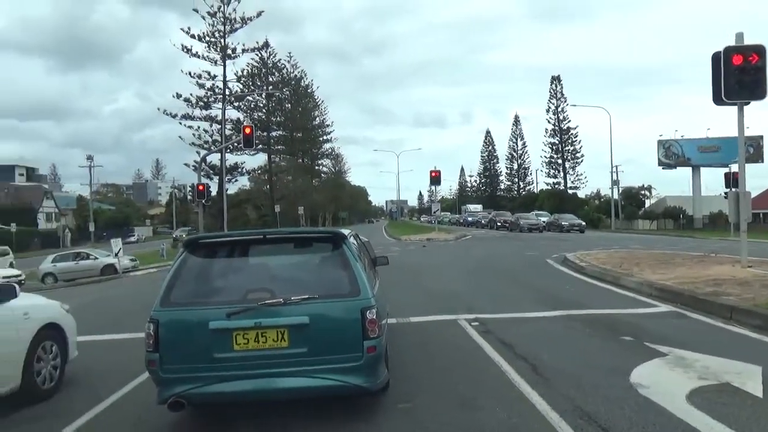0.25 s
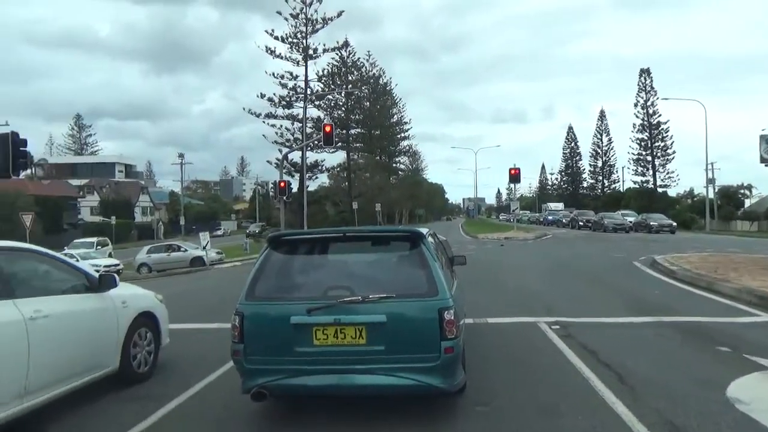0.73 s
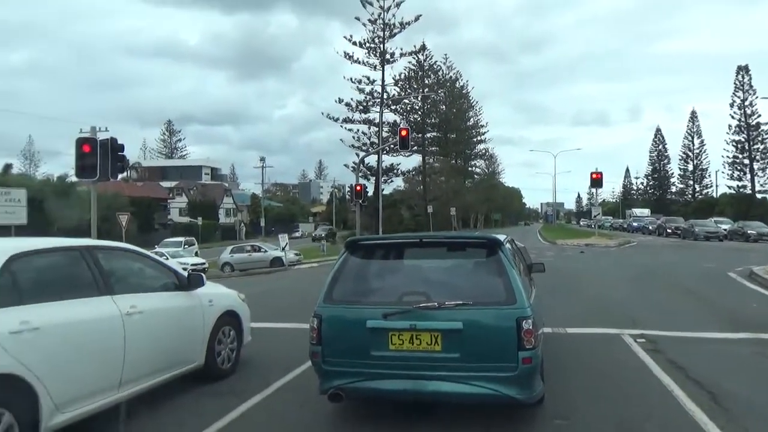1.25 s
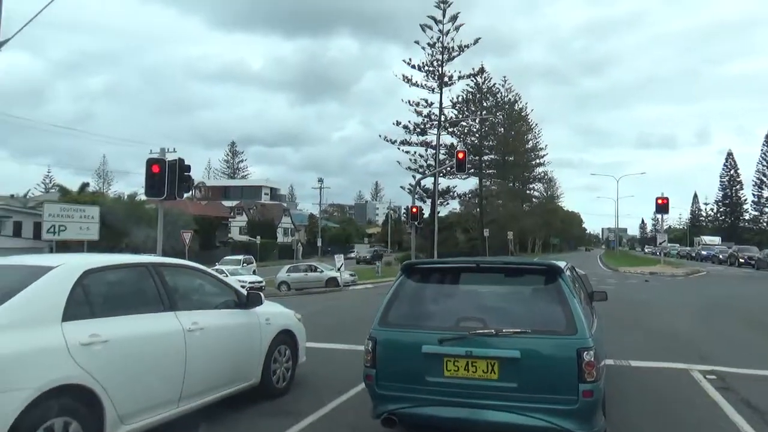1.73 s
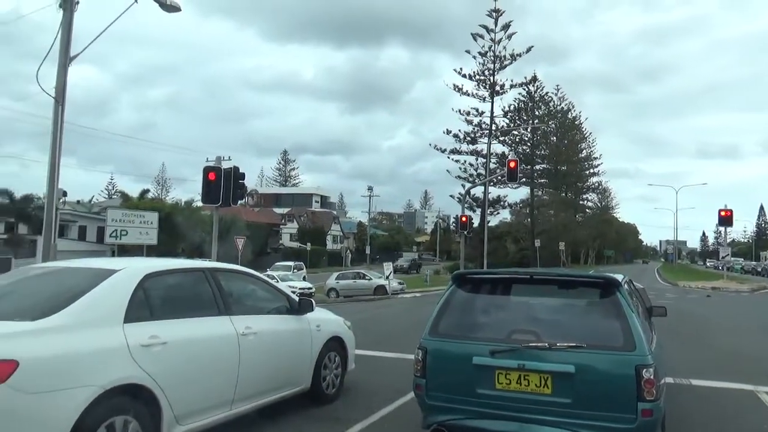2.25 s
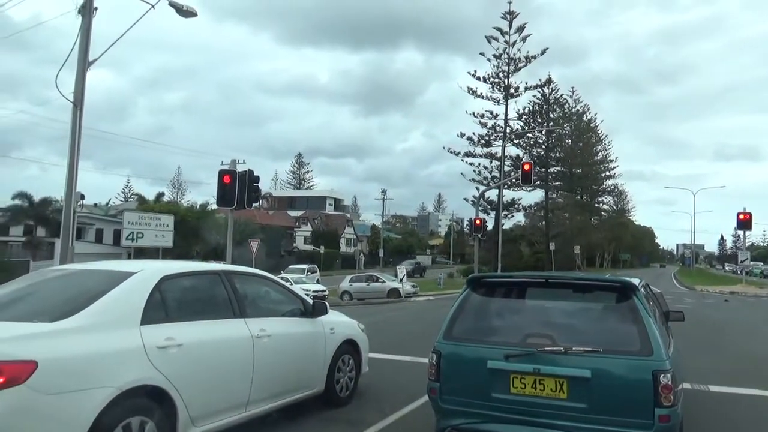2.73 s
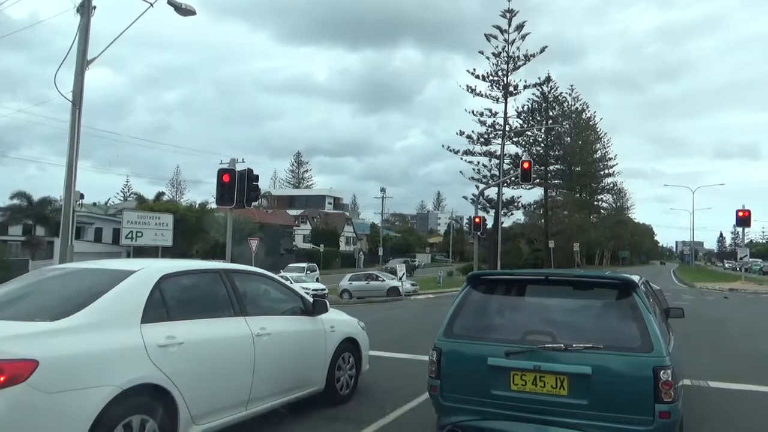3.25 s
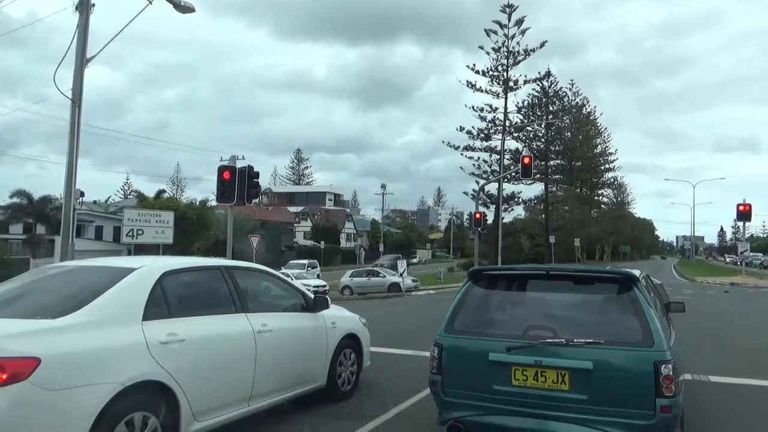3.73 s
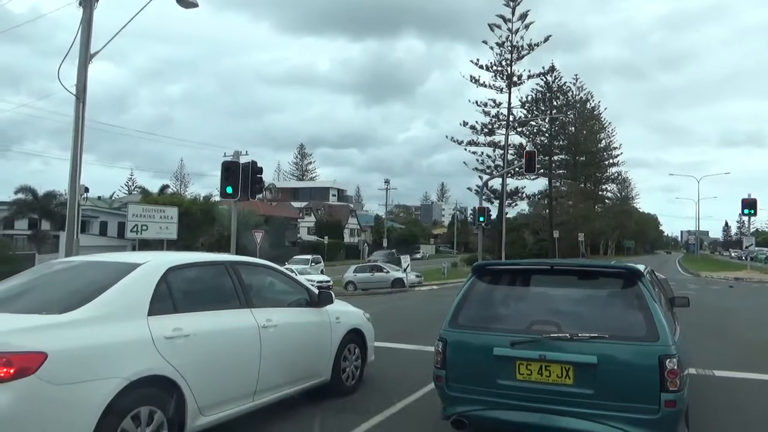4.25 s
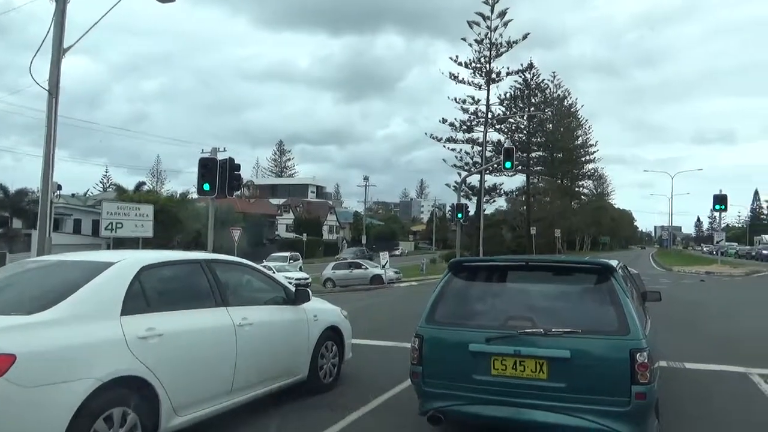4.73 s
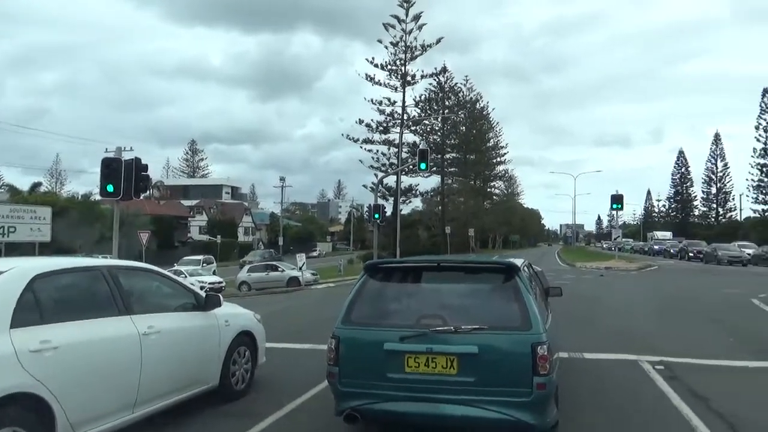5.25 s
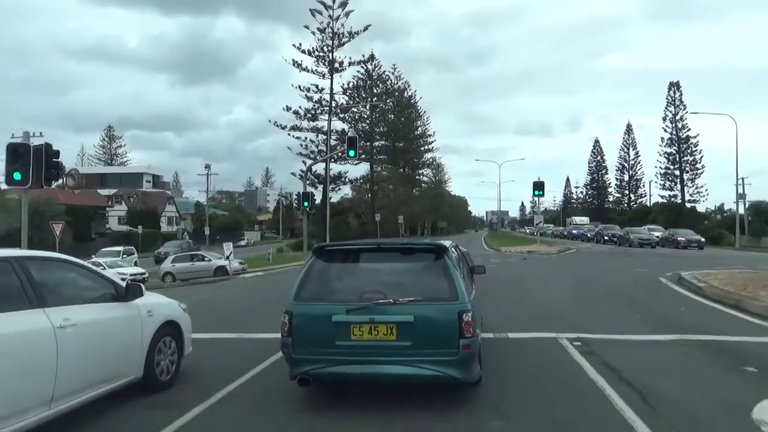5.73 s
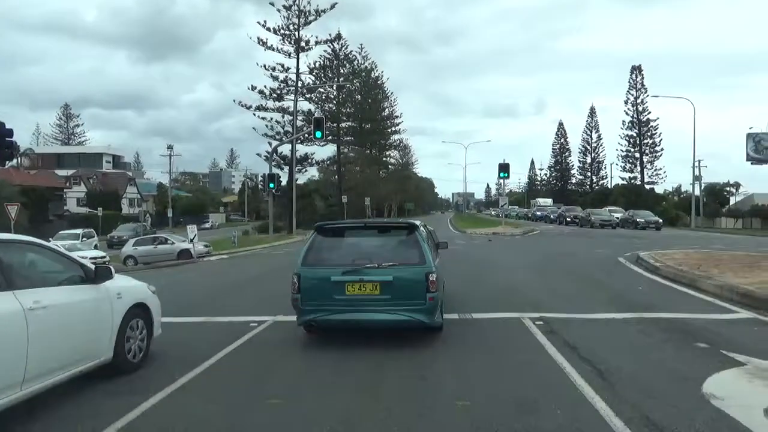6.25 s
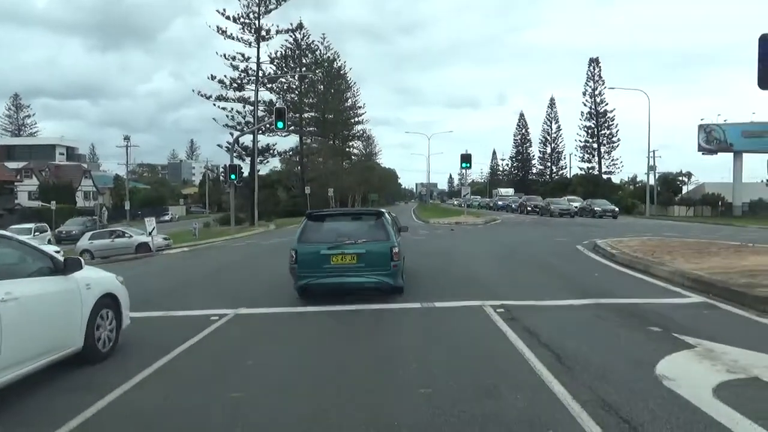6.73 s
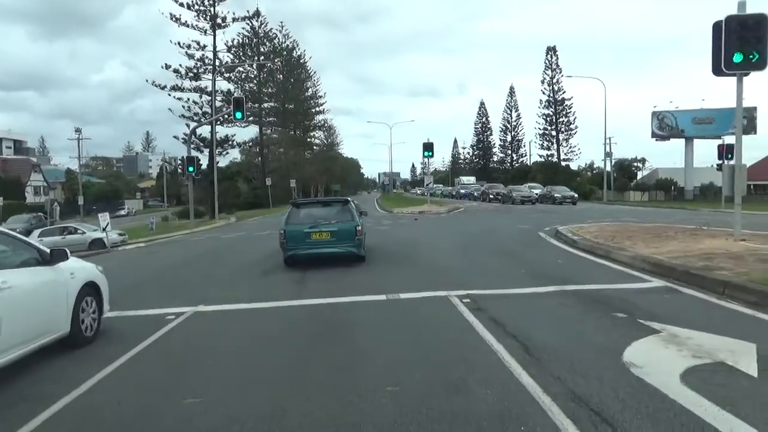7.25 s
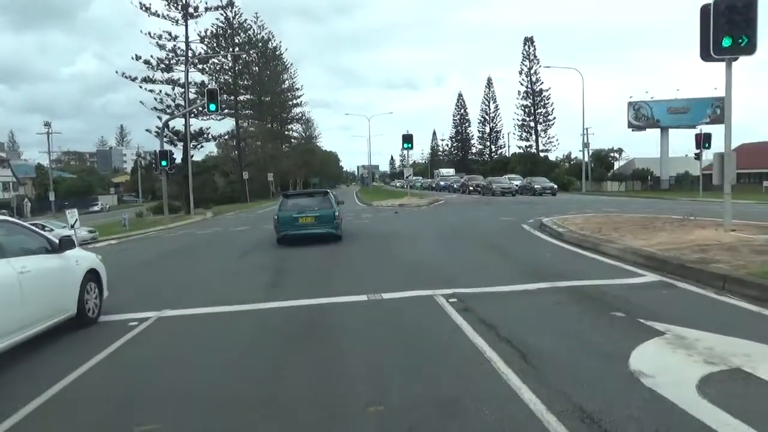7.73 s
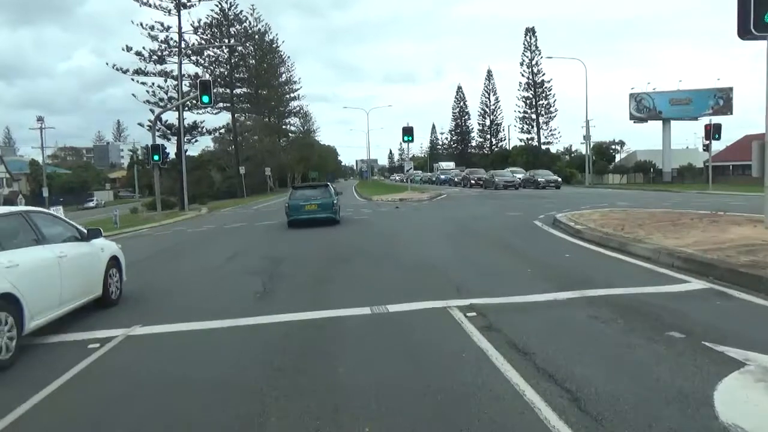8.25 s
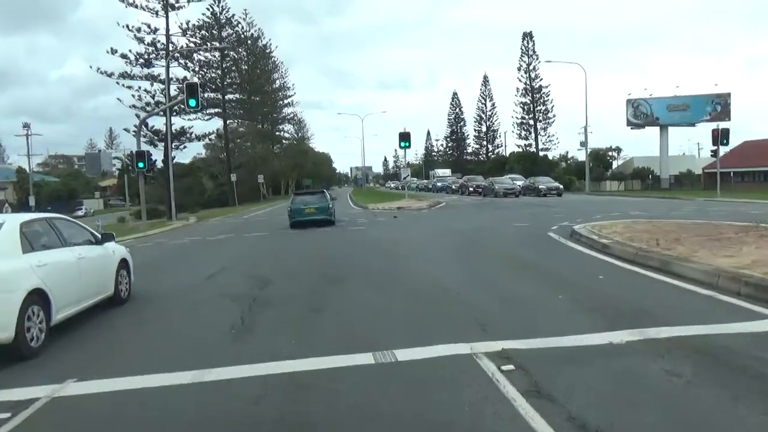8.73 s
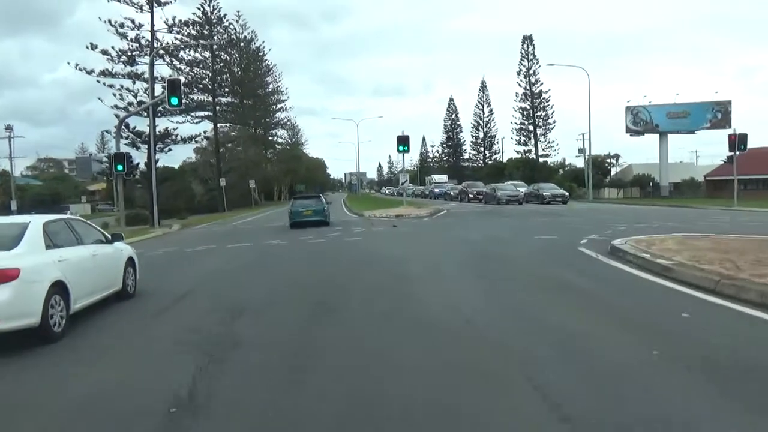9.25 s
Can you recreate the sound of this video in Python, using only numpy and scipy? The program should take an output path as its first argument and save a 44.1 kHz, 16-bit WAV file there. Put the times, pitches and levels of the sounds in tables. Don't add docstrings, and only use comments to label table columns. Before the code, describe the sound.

An uneven, knocking engine idles inside a cab, gets a throttle blip and a gear clack, then pulls away revving as brakes squeal.

```python
import sys
import numpy as np
from scipy import signal
from scipy.fft import rfft, irfft, next_fast_len
from scipy.io import wavfile
from scipy.ndimage import uniform_filter1d, map_coordinates

SR = 44100
rng = np.random.default_rng(int(sys.argv[2]) if len(sys.argv) > 2 else 0)


def amplitude_ratio(level_db):
    exponent = np.asarray(level_db, float) / 20
    return 10 ** exponent


def wav_record(signal):
    frames = np.transpose(np.atleast_2d(signal))
    bounded = np.clip(frames, -1, 1)
    quanta = np.round(bounded * 32767).astype(np.int16)
    wavfile.write(sys.argv[1], SR, quanta)


N = 418950
t = np.arange(N) / SR
PULLS_AWAY_S, ROLLING_S = 6.63, 8.89

# (time [s], firing rate [Hz])
REVS = [(0, 48.75), (4.8, 48.75), (5.03, 57), (5.09, 88), (5.26, 109), (5.4, 113.5), (5.7, 106.5),
        (6.08, 95.5), (6.35, 87.5), (6.45, 93), (6.62, 107.5), (6.82, 117), (7.04, 133), (7.55, 166),
        (8.0, 201), (8.3, 214), (8.5, 205), (9.5, 180)]
# (time [s], level [dB])
LOAD = [(0, -1.5), (1.2, 0.5), (4.4, -1), (4.93, 4.5), (5.03, 13), (5.16, 12.5), (5.27, 13.5), (5.7, 9),
        (6.3, 2), (6.45, 3.5), (6.6, 10), (7.05, 16), (7.3, 15), (8.0, 8.5), (8.35, -1.5), (8.5, -0.5),
        (9.5, 0)]
# (frequency [Hz], level [dB])
CABIN_BOOM = [(40, -27.5), (60, -32.5), (85, -32.5), (115, -26), (150, -41), (161, -37.5), (175, -44),
              (187, -33.5), (200, -29), (240, -25), (420, -48)]
# (frequency [Hz], level [dB])
OCTAVE_BOOM = [(90, -33), (130, -35.5), (176, -41), (197, -36.5), (225, -33), (300, -48), (430, -31)]
UNEVEN_MULTIPLES = [4, 5, 7, 9, 11, 13, 15, 17, 21, 24, 29, 32, 37, 40, 44]
UNEVEN_DB = [-18, -8, -13, -16, -17, -4.5, -11, -17, -12, -3, -8, -6, -1, -10, -11]
UNEVEN_IN_GEAR_DB = [4, 6, -4, 3, 17, 0, -2, 8, -5, -5, -5, -7, -13, -9, -8]
# (frequency [Hz], level [dB])
CAB_PASS = [(20, -8), (30, -10), (70, -9), (120, 11.5), (180, -5.5), (280, -5.5), (345, 2), (450, -11.5),
            (600, -3), (900, -51)]
CLUTCH_BITE_DB = [-6, -0.5, -0.5]
CYLINDER_BLOWS = [1.0, 0.12, 0.9, 0.05, 0.35, 0.08, -0.5, 0.15]
# (frequency [Hz], width [Hz], level [dB])
PANELS = [(155.8, 27.6, -8), (197.6, 16, 1.5), (234.8, 23, 5.5), (258, 26, 2), (369.6, 26, -7.5),
          (544, 35, -16), (620, 30, -18), (758.5, 30, -24)]
# (frequency [Hz], width [Hz], level [dB])
FAN_WHIRR = [(1279, 27, -65), (1500, 176, -56), (1680, 330, -67.5)]
# (frequency [Hz], level [dB])
WAITING_HUMS = [(15, -58), (18.3, -60), (24.4, -46), (39, -41), (58, -40)]
# (time [s], firing rate [Hz], effort [dB], rasp of its octave [dB])
OTHER_ENGINE = [(6.45, 50, -15, -3), (6.75, 48, 2, -23), (6.93, 46.93, 7.5, -19), (7.09, 52.74, 6, -22),
                (7.55, 52.88, 5.5, 5), (7.8, 50.8, 9.5, -8), (8.42, 50.4, 2.5, -6), (8.68, 56.84, 8, -9),
                (8.86, 65.04, 14.5, -15), (9.06, 71, 17, -10.5), (9.22, 77.7, 14, -3.5),
                (9.31, 82.1, 10, 5.5), (9.4, 83.8, 12.5, -1), (9.5, 84.2, 14.5, -10)]
# (time [s], level [dB])
PAD_PRESSURE = [(6.635, -50), (6.67, -40), (6.69, -43), (6.72, -41), (6.735, -35), (6.865, -36.5),
                (6.88, -46), (6.95, -39.5), (6.97, -47), (7.03, -46), (7.045, -39), (7.11, -41),
                (7.15, -50), (7.3, -43), (7.37, -36), (7.57, -38), (7.59, -45), (7.61, -44), (7.63, -52)]
# (time [s], frequency [Hz])
SQUEAL_PITCH = [(6.63, 3958), (6.66, 3921), (6.77, 3890), (6.89, 3866), (7.07, 3814), (7.38, 3794),
                (7.5, 3812), (7.64, 3865), (8.3, 3785)]
# (time [s], level [dB])
SQUEAL_OCTAVE = [(6.63, -62), (6.75, -57), (6.9, -58), (6.96, -53), (7.08, -55), (7.12, -48.5), (7.5, -50),
                 (7.53, -55), (7.6, -60)]
# (peak time [s], fall [s], level [dB])
CHIRPS = [
    (7.672, .06, -51),
    (8.47, .11, -39),
    (9.05, .05, -45),
    (9.49, .04, -46),
]
# (start [s], end [s], low [Hz], high [Hz], level [dB])
HOLLOWS = [
    (6.72, 7.62, 3960, 4110, -6),
    (6.9, 7.35, 3940, 4110, -9),
    (7.05, 7.33, 3970, 4100, -30),
    (7.46, 7.53, 3930, 4080, -20),
    (8.44, 8.57, 3960, 4110, -14),
    (6.93, 7.03, 7830, 8150, -12),
    (7.12, 7.52, 8000, 8200, -16),
    (7.2, 7.36, 7780, 8200, -35),
    (7.36, 7.52, 7780, 8100, -12),
    (8.45, 8.54, 7800, 8200, -16),
]
# (time [s], peak [dB], centre [Hz], broadband crack [dB])
TICKS = [(.36, -42, 2600, -24), (0.637, -32, 690, -40), (.999, -32, 5400, 7), (1.041, -25, 643, -30.5),
         (1.224, -40, 3700, -30), (1.239, -32, 744, -40), (1.39, -42, 8000, -20), (2.473, -34, 2700, -31),
         (2.605, -40, 2540, -19), (2.881, -41, 6460, -22), (3.317, -31.5, 740, -40), (3.66, -42, 5150, -27),
         (4.06, -46, 7000, -23), (4.669, -37, 1300, -28), (4.857, -33, 1400, -23),
         (4.862, -18, 1060, -19.5), (4.895, -15, 330, -39), (4.919, -16, 350, -32), (4.972, -18, 377, -36),
         (5.037, -32.5, 2000, -16), (5.372, -28, 746, -42), (5.377, -35, 2900, -22),
         (5.412, -27, 1990, -17), (5.52, -35.5, 2500, -17), (5.634, -25, 2320, -10), (5.637, -28, 890, -29),
         (5.889, -38, 1700, -16), (5.894, -20, 580, -34), (6.259, -36, 1300, -21), (6.333, -36, 1300, -28),
         (6.513, -18, 770, -41), (6.524, -28, 1500, -23), (6.533, -15, 845, -29), (6.553, -22, 400, -47),
         (6.58, -18, 590, -33), (6.598, -27, 500, -40), (6.628, -27, 1500, -20), (6.633, -27, 1570, -35),
         (6.642, -35, 1560, -30), (6.644, -21, 850, -36), (6.7, -28, 910, -20), (6.884, -30, 894, -32),
         (7.811, -31.5, 3120, -23), (8.354, -31, 3096, -18)]
# (time [s], level [dB])
LATCH = [
    (6.122, -7),
    (6.125, -7),
    (6.131, -1),
    (6.139, -3),
    (6.15, 0.5),
    (6.162, -5.5),
]
# (frequency [Hz], level [dB], T60 [s])
LEVER_MODES = [(382, -8, 0.029), (472, -8, 0.04), (527, -6, 0.15), (600, -7, 0.05), (715, 1, 0.05),
               (803, -3, 0.04), (885, -5, 0.05), (1037, -13, 0.06), (1100, -17, 0.029), (1510, -25, 0.028)]
# (time [s], level [dB], frequency [Hz], T60 [s])
FLOOR_THUMPS = [
    (4.867, -26, 296, 0.3),
    (4.916, -21, 140.3, 0.4),
    (4.95, -13, 114.1, 0.74),
    (5.009, -5, 118.6, 0.44),
    (6.5, -19.5, 37.7, 0.82),
    (6.519, -26, 262, .1),
    (7.377, -19.5, 204.6, 1),
]
# (time [s], length [s], level [dB], tilt [dB per octave])
SCUFFS = [(0, 1, -53.5, -2), (4.66, 0.15, -40, -1.5), (4.793, 0.095, -44.5, -1.5),
          (4.849, 0.061, -32.5, -5), (4.875, 0.13, -31.5, -4.5), (5.03, 0.12, -52, 1),
          (5.207, 0.11, -38, -5), (5.4, 0.15, -44.5, -1), (5.564, 0.12, -44.5, 0.5),
          (6.261, 0.11, -43.5, -4.5), (6.517, 0.063, -24, -5.5), (6.565, 0.059, -25, -6.5),
          (6.613, 0.053, -25, -5.5), (6.66, 0.057, -36, -5), (6.753, 0.034, -32.5, -4),
          (7.054, 0.047, -31, -4), (7.151, 0.048, -33, -3.5), (4.701, 0.98, -50, -1.5),
          (7.55, 0.042, -40, -3), (7.622, 0.054, -27, -5.5), (8.588, 0.028, -24.5, -6),
          (8.888, 0.033, -33.5, -3.5)]
# (frequency [Hz], density [dB per Hz])
SCRAPE_COLOUR = [(500, 8), (1000, -1), (3300, -7.5), (4600, -21), (9000, -20)]
# (frequency [Hz], density [dB per Hz])
RUMBLE_COLOUR = [(10, -24), (18, -5), (30, -13), (45, 7.5), (70, -2), (110, 3), (150, 1), (230, -1),
                 (270, -8), (320, -13), (420, -40)]
# (frequency [Hz], density [dB per Hz])
ROAR_COLOUR = [(160, -20), (270, -1.5), (309, -10.5), (354, -2.5), (410, -12), (508, -6.5), (581, -14),
               (762, -13.5), (844, -17.5), (1180, -22.5), (1480, -29), (2200, -41.5), (4000, -41),
               (5200, -100), (8800, -120)]
# (frequency [Hz], density [dB per Hz])
HISS_COLOUR = [(1500, 12), (2500, 6), (4000, -1), (6000, -3.5), (7500, -3.5), (9000, -2), (10500, -6.5),
               (11400, -19)]
# (frequency [Hz], density [dB per Hz])
GROUND_COLOUR = [(8, -30), (15, -24), (28, -24), (42, -19), (65, -17.5), (90, -24)]
# (time [s], half length [s], level [dB])
BUMPS = [
    (6.702, 0.27, -46),
    (7.123, 0.23, -28.5),
    (8.755, 0.5, -24),
    (9.276, 0.3, -34),
]
# (frequency [Hz], width [Hz], level [dB])
FAR_BRAKES = [(8000, 300, -63.5), (8770, 500, -62), (9460, 300, -63.5), (7000, 250, -71)]
# (frequency [Hz], left over right [dB], left leads [rad], likeness [0-1])
PORTS = [(30, 0.5, -0.33, 0.8), (60, -5, -1, 1), (111, -6.5, -0.74, 1), (197, -9, -0.88, 0.82),
         (330, -6.5, -0.65, 0.8), (606, -2, 0.41, 0.57), (1080, 0, -0.5, 0.6), (2000, 0, -0.4, 0.65),
         (4000, 0.5, -0.5, 0.6), (10000, 0, -0.4, 0.75)]


def evened(x):
    return x / np.sqrt(np.mean(x ** 2) + 1e-20)


def columns(rows, at):
    s, *values = np.transpose(rows)
    return [np.interp(at, s, v) for v in values]


def ramp(start_s, length_s):
    return np.clip((t - start_s) / length_s, 0, 1)


def soft_start(length, rise_s):
    return np.minimum(np.arange(length) / SR / rise_s, 1)


def add(mix, s, sound):
    part = mix[..., round(s * SR):][..., :sound.shape[-1]]
    part += sound[..., :part.shape[-1]]


def drift(per_s):
    knots = rng.standard_normal(400)
    return map_coordinates(knots, [t[::64] * per_s], order=3).repeat(64)[:N]


def coloured(x, points):
    hz = np.fft.rfftfreq(x.shape[-1], 1 / SR)
    f, db = np.transpose(points)
    gain = amplitude_ratio(np.interp(np.log(hz + 1), np.log(f), db, left=-90, right=-90))
    return evened(irfft(rfft(x) * gain, x.shape[-1]))


def band(x, hz, width):
    return signal.lfilter(*signal.iirpeak(hz, hz / width, SR), x)


def breath(hz, width):
    return evened(band(band(rng.standard_normal(N), hz, width), hz, width))


def tone(turns, db, waver_db=1., slip=.2):
    level = np.sqrt(2) * amplitude_ratio(db + waver_db * drift(14))
    return level * np.sin(2 * np.pi * (turns + rng.random()) + slip * drift(11))


def ring(hz, db, t60):
    u = np.arange(int(SR * .6)) / SR
    return amplitude_ratio(db - 60 * u / t60) * np.sin(2 * np.pi * hz * u)


def boom(hz, points=CABIN_BOOM):
    return columns([(np.log(f), db) for f, db in points], np.log(hz))[0]


def engine_levels(hz, load_db):
    declutch_s = 8.4
    firing_db = load_db + boom(hz) - 5 * ramp(declutch_s, .16)
    octave_db = .9 * load_db + boom(2 * hz, OCTAVE_BOOM)
    uneven_db = -39 + .24 * load_db + 4.5 * np.log2(hz / hz[0])
    uneven_db = uneven_db - 19 * ramp(declutch_s, .2)
    knock_db = -32 + .68 * load_db - .3816 * np.maximum(hz - 110, 0)
    bite = ramp(PULLS_AWAY_S, .062)
    in_gear = [db + change * bite for db, change in zip([octave_db, uneven_db, knock_db], CLUTCH_BITE_DB)]
    return firing_db, *in_gear


def engine():
    hz, = columns(REVS, t)
    firing_db, octave_db, uneven_db, knock_db = engine_levels(hz, *columns(LOAD, t))
    firings = np.cumsum(hz) / SR + 8. + .05 * drift(5)
    limp = 1 - .35 * np.cos(np.pi * (firings + .3) / 4)
    out = tone(firings, firing_db) + tone(2 * firings, octave_db) * limp
    for k, db, gear_db in zip(UNEVEN_MULTIPLES, UNEVEN_DB, UNEVEN_IN_GEAR_DB):
        cab_db = boom(hz * k / 8, CAB_PASS) + gear_db * ramp(PULLS_AWAY_S, .1)
        slip = .03 * k * (hz[0] / hz) ** 1.5
        out += tone(firings * k / 8, uneven_db + db + cab_db, waver_db=2., slip=slip)
    return out + amplitude_ratio(knock_db) * evened(knock(hz, firings)) + fan(), firings


def knock(hz, firings):
    at = np.flatnonzero(np.diff(np.floor(firings)))
    chance = rng.standard_normal((len(at), 2))
    cylinder = np.floor(firings[at + 1]).astype(int) % 8
    vary = amplitude_ratio(1.5 * chance[:, 0])
    blows, sump = np.zeros(N), np.zeros(N)
    blows[at] = np.take(CYLINDER_BLOWS, cylinder) * vary + .12 * chance[:, 1]
    sump[at] = (cylinder == 7) * vary
    panels = sum((-1) ** k * ring(f, db, 2.2 / width) for k, (f, width, db) in enumerate(PANELS))
    panels *= soft_start(len(panels), .0043)
    out = signal.oaconvolve(blows / np.sqrt(hz / 49), panels)[:N]
    return out + signal.oaconvolve(sump * (t < PULLS_AWAY_S), ring(152, -4, .06))[:N]


def fan():
    whirr = sum(amplitude_ratio(db) * breath(f, width) for f, width, db in FAN_WHIRR)
    return whirr * (1 + .55 * evened(band(rng.standard_normal(N), 22, 6)))


def drone(firings):
    hz, = columns(REVS, t)
    revving = np.clip((hz - 83.8) / 15, 0, 1)
    door = revving * np.interp(t, [PULLS_AWAY_S - .5, PULLS_AWAY_S], [1, 0])
    popping = np.interp(t, [5.74, 5.94, 6.45, 6.5], [0, 1, 1, 0])
    blows = np.diff(np.floor((firings + 2) / 8), prepend=1) * amplitude_ratio(2 * rng.standard_normal(N))
    out = np.zeros(N)
    for gain, f, db, t60 in [(door, 263, -10, .093), (popping, 118, -12.5, .11)]:
        mode = ring(f, db, t60)
        out += signal.oaconvolve(blows * gain, soft_start(len(mode), .012) * mode)[:N]
    return out


def neighbour():
    waiting = np.interp(t, [4.7, 5.05], [1, 0]) * sum(tone(hz * t, db) for hz, db in WAITING_HUMS)
    hz, effort_db, rasp_db = columns(OTHER_ENGINE, t)
    firing_db = effort_db + boom(hz)
    octave_db = firing_db + rasp_db
    turns = np.cumsum(hz) / SR
    stack = tone(turns, firing_db) + tone(2 * turns, octave_db, waver_db=3.)
    stack += tone(turns / 2, firing_db - 39, waver_db=9.)
    stack += tone(1.5 * turns, firing_db - 16, waver_db=3.)
    stack += tone(3 * turns, octave_db - 9, waver_db=3.)
    stack += ramp(9.08, .1) * tone(1.72 * turns, -24)
    return waiting + np.interp(t, [6.45, 6.55], [0, 1]) * stack


def brake():
    rise_s, ends_db = .04, -14
    chirps = [[(s - rise_s, db + ends_db), (s, db), (s + fall, db + ends_db)] for s, fall, db in CHIRPS]
    pads = [PAD_PRESSURE] + chirps
    touching = sum(1. * (t > rows[0][0]) * (t < rows[-1][0]) for rows in pads)
    touching = uniform_filter1d(touching, 600)
    (hz,), (db,) = columns(SQUEAL_PITCH, t), columns(sum(pads, []), t)
    octave_db = db - 11.5 - .0864 * (hz - 3800) - 14 * (t > 8.8)
    octave_db = np.where(t < PAD_PRESSURE[-1][0], *columns(SQUEAL_OCTAVE, t), octave_db)
    stutter = np.where(t < 7.15, .1, .3)
    octave_stutter = 1.7 * stutter
    slips = breath(27, 40)
    turns = np.cumsum(hz) / SR
    octave = tone(2 * turns, octave_db, waver_db=2., slip=.5)
    main = tone(turns + .22 * stutter * breath(25, 40), db)
    main *= np.sqrt(1 - stutter ** 2) + stutter * slips
    octave *= np.sqrt(1 - octave_stutter ** 2) + octave_stutter * slips
    return touching * (main + octave)


def gear_lever():
    out = np.zeros(N)
    lever = sum(ring(*mode) * rng.choice([-1, 1]) for mode in LEVER_MODES)
    for s, db in LATCH:
        add(out, s, amplitude_ratio(db - 14) * lever * rng.choice([-1, 1]))
    snap = ring(3830, -9, .0066) + ring(5800, -22, .0048) + ring(9500, -24, .005) + ring(3750, -32, .037)
    add(out, LATCH[0][0], snap)
    colour = [(400, -21), (700, 13), (1100, 4), (1800, -11), (3600, -13.5), (5000, -15), (11000, -25.5)]
    rattle = coloured(rng.standard_normal(4000), colour)
    fade_db = -60 * np.maximum(np.arange(4000) / SR - .022, 0) / .08
    add(out, LATCH[0][0], rattle * amplitude_ratio(-23 + fade_db) * soft_start(4000, .003))
    return out


def ratchet():
    out, tooth_hz, tooth_db = np.zeros(N), 3150, -43
    for k in range(8):
        tooth = ring(tooth_hz, tooth_db - k, .016) + ring(.64 * tooth_hz, tooth_db, .02)
        add(out, 5.212 + (k + .3 * rng.random()) * .018, tooth)
    return out


def trim_ticks():
    out, u = np.zeros(N), np.arange(1500) / SR
    for s, db, hz, crack_db in TICKS:
        puff = rng.standard_normal(len(u)) * amplitude_ratio(-60 * u / .03) * soft_start(len(u), .001)
        tick = band(band(puff, hz, .6 * hz), hz, hz) + amplitude_ratio(crack_db) * puff
        tick += np.sqrt(60 / hz) * ring(hz, 0, .015)[:len(u)]
        add(out, s, amplitude_ratio(db) * tick / abs(tick).max())
    return out


def floor_thumps():
    out = np.zeros(N)
    for s, db, hz, t60 in FLOOR_THUMPS:
        mode = ring(hz, db, t60)
        add(out, s, mode * soft_start(len(mode), .02))
    return out


def scuffs():
    out = np.zeros((2, N))
    for s, length, db, tilt in SCUFFS:
        noise = rng.standard_normal((3, int(length * SR)))
        grain = amplitude_ratio(1.5 * evened(uniform_filter1d(noise[2], 150)))
        colour = [(250, -1), (400, -.8 * tilt), (3200, 3.7 * tilt), (4200, 5.1 * tilt), (11300, 6 * tilt)]
        u = np.linspace(0, 1, len(grain))
        swell = np.minimum(u / .08, 1) * (1 - u ** min(40 * length, 5))
        add(out, s, amplitude_ratio(db) * coloured(noise[:2] * grain, colour) * swell)
    return out


def scrape():
    out, u = np.zeros((2, N)), np.linspace(0, 1, int(.136 * SR))
    grain = amplitude_ratio(3.4 * evened(uniform_filter1d(rng.standard_normal(len(u)), 120)))
    rasp = coloured(rng.standard_normal((2, len(u))) * grain, SCRAPE_COLOUR)
    add(out, 4.856, amplitude_ratio(-34) * rasp * np.minimum(u / .03, 1) * (1 - u ** 12))
    return out


def cab(x):
    u = np.arange(3000) / SR
    tails = rng.standard_normal((2, len(u))) * amplitude_ratio(-60 * u / .065)
    return signal.oaconvolve(x[None], tails / np.linalg.norm(tails[0]), axes=1)[:, :N]


def wash_levels():
    (hz,), (load_db,) = columns(REVS, t), columns(LOAD, t)
    road = np.interp(t, [PULLS_AWAY_S, ROLLING_S], [0, 1])
    lurch = sum(amplitude_ratio(db) * np.maximum(1 - abs(t - s) / half, 0) for s, half, db in BUMPS)
    overrun = uniform_filter1d(1. * (np.gradient(hz) < 0) * (road == 0), size=8000)
    rumble = amplitude_ratio(-37 - .2451 * (hz - hz[0])) + amplitude_ratio(-25) * np.sqrt(road) + lurch
    roar = amplitude_ratio(-36.5 + .45 * load_db - 1.5 * overrun + 13 * road)
    hiss = amplitude_ratio(-60 + .016 * load_db + 10.5 * np.sqrt(road))
    return rumble, roar, hiss


def wash(firings):
    shake, bay, air = wash_levels()
    noise = rng.standard_normal((4, 2, N))
    puffs = 1 + .2 * np.exp(-(firings % 1) / .3) + .3 * np.exp(-((firings + 1) % 2) / .5)
    rumble = shake * amplitude_ratio(1.1 * drift(4.9)) * coloured(noise[0], RUMBLE_COLOUR)
    roar = bay * amplitude_ratio(1.02 * drift(25)) * coloured(noise[1] * puffs, ROAR_COLOUR)
    hiss = air * amplitude_ratio(8.5 + .92 * drift(30)) * coloured(noise[2], HISS_COLOUR)
    ground = amplitude_ratio(-36.5) * coloured(noise[3], GROUND_COLOUR)
    return ground + rumble + roar + hiss


def far_brakes():
    whistles = sum(amplitude_ratio(db + 2 * drift(9.5)) * breath(f, width) for f, width, db in FAR_BRAKES)
    return whistles * np.interp(t, [0, .55, .9], [.8, 1, 0])


def scene():
    own, firings = engine()
    squeal = brake()
    sharp = ratchet() + trim_ticks() + gear_lever() + floor_thumps()
    reflections = cab(amplitude_ratio(-3) * sharp + amplitude_ratio(-18) * squeal)
    size = next_fast_len(N + SR)
    shared, apart = rfft(wash(firings) + scuffs() + reflections + scrape(), size)
    close = rfft(own + neighbour() + far_brakes() + drone(firings) + sharp + squeal, size)
    hz = np.fft.rfftfreq(size, 1 / SR)
    lean_db, lead, same = columns([(np.log(p[0]), *p[1:]) for p in PORTS], np.log(hz + 1))
    same, port = np.clip(same, 0, 1), amplitude_ratio(lean_db) * np.exp(1j * lead)
    left = (close + same * shared + np.sqrt(1 - same ** 2) * apart) * port
    passed = (hz > 8) * (hz < 11050) / (abs(1 + port) / 2)
    return irfft(np.array([left, close + shared]) * passed, size)[:, :N]


def hollowed(x):
    hz, s, z = signal.stft(x, SR, nperseg=1024)
    hollow_db = sum(db * np.outer((hz > low) & (hz < high), (s > start) & (s < end))
                    for start, end, low, high, db in HOLLOWS)
    return signal.istft(z * amplitude_ratio(hollow_db), SR, nperseg=1024)[1][:, :N]


def low_pass(x):
    return signal.sosfilt(signal.butter(12, 11150, fs=SR, output="sos"), x)


def record(dry):
    ceiling = .95
    mix = hollowed(ceiling * np.tanh(dry / ceiling))
    return low_pass(mix)


dry = scene()
out = record(dry)
wav_record(out)
```